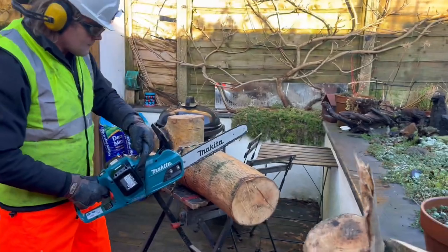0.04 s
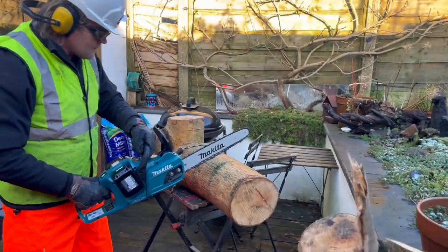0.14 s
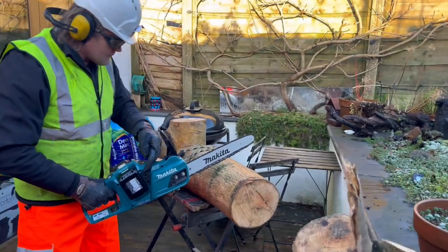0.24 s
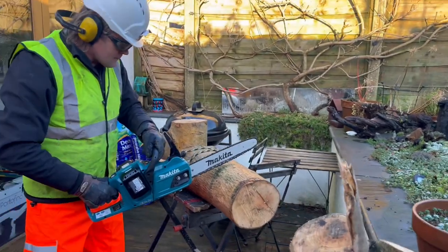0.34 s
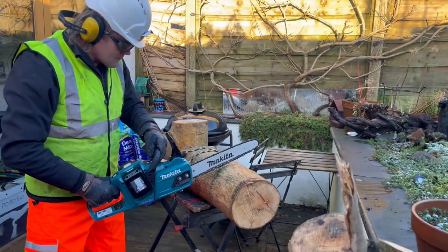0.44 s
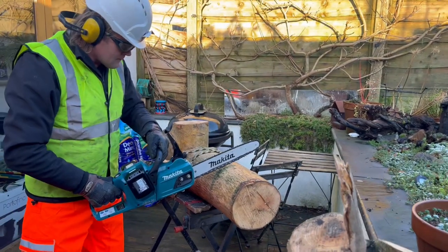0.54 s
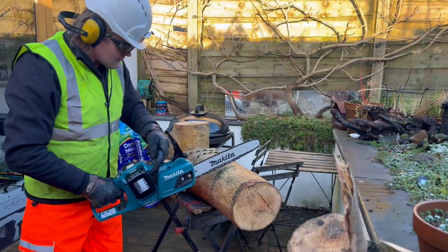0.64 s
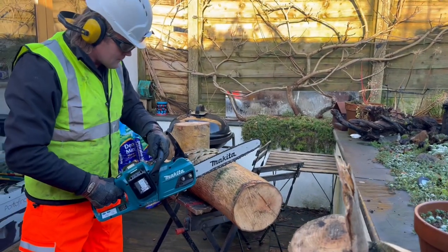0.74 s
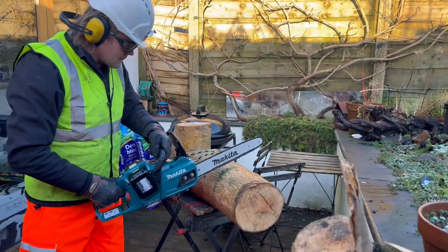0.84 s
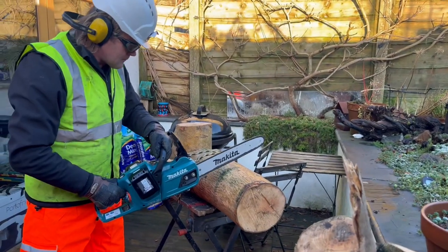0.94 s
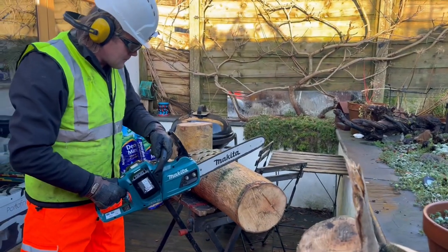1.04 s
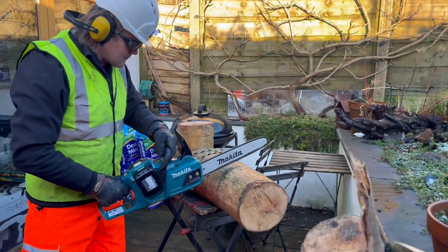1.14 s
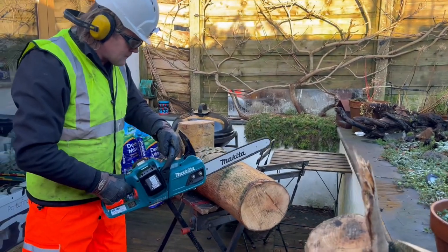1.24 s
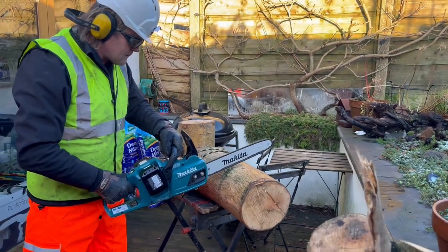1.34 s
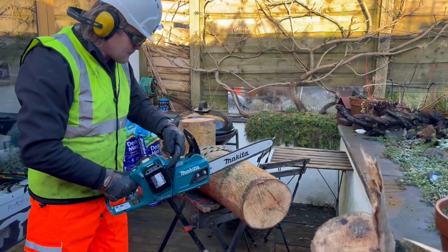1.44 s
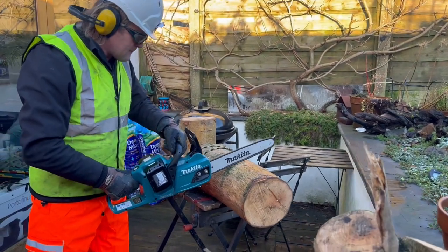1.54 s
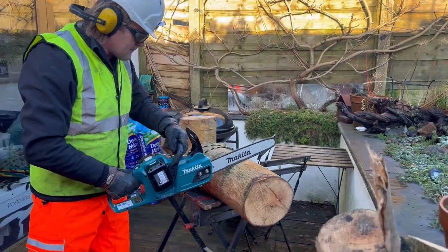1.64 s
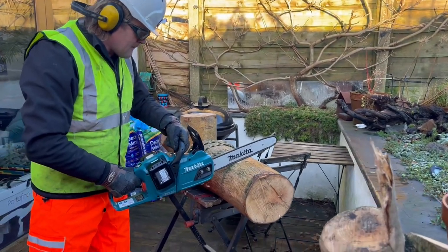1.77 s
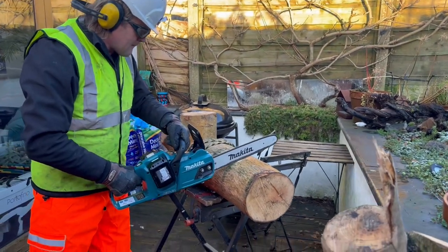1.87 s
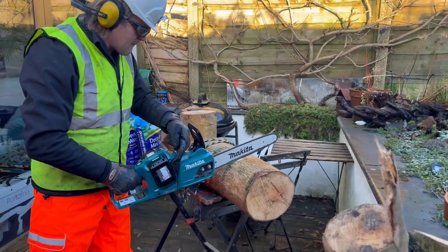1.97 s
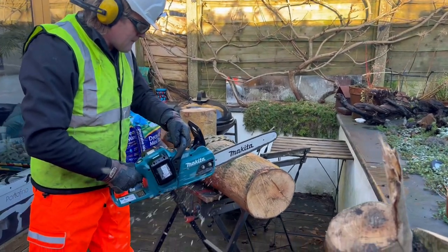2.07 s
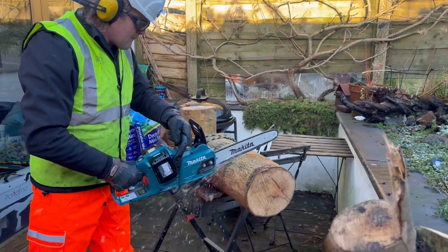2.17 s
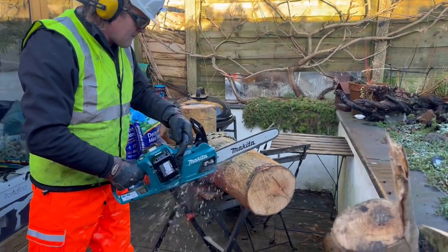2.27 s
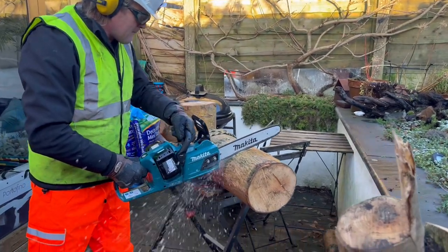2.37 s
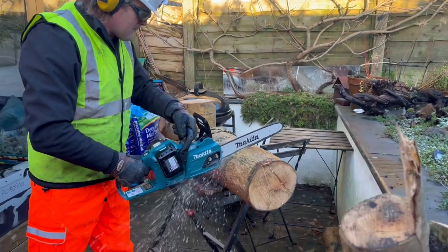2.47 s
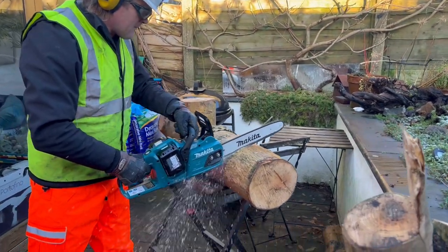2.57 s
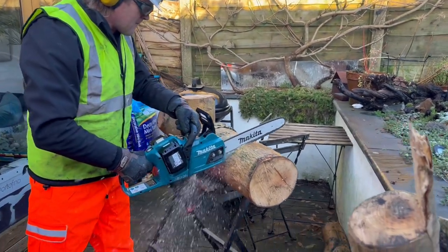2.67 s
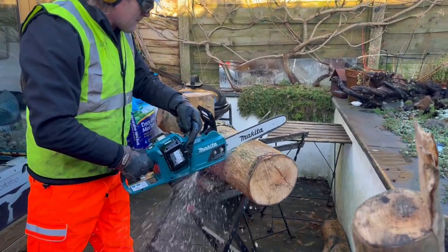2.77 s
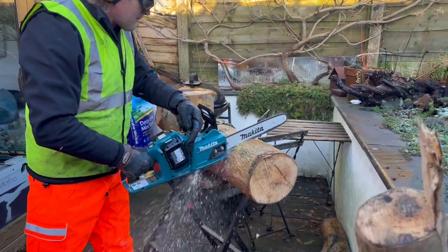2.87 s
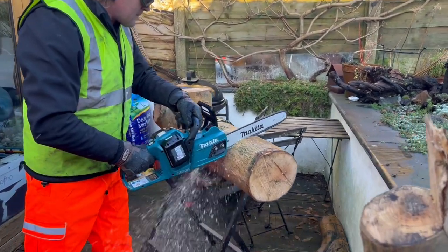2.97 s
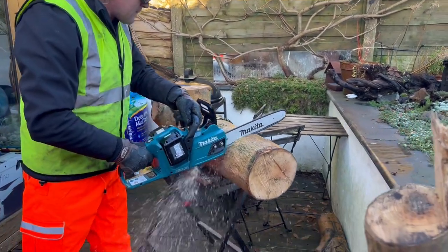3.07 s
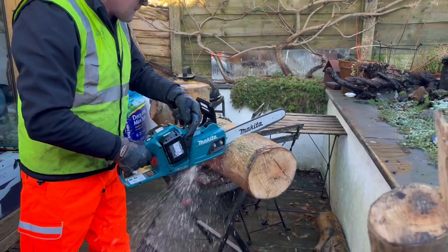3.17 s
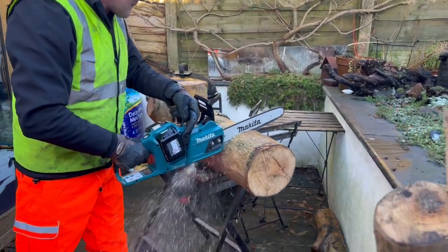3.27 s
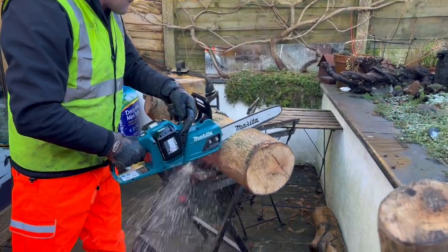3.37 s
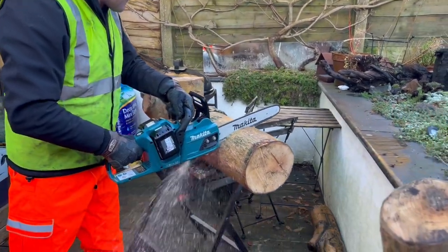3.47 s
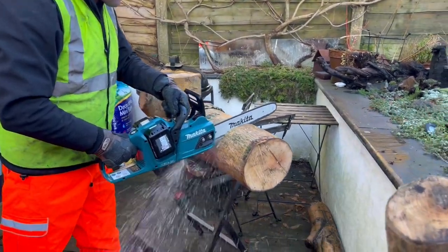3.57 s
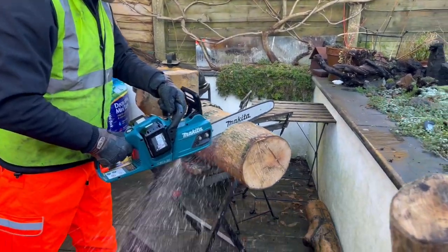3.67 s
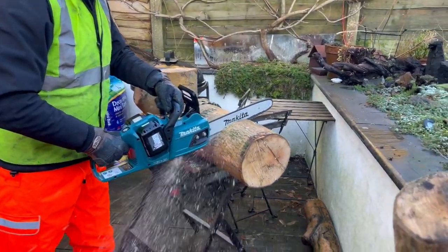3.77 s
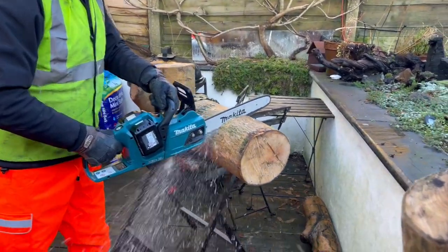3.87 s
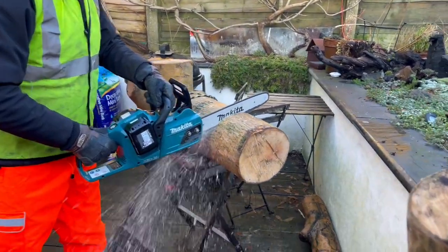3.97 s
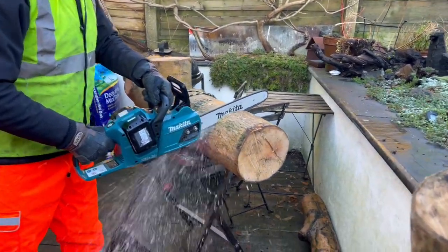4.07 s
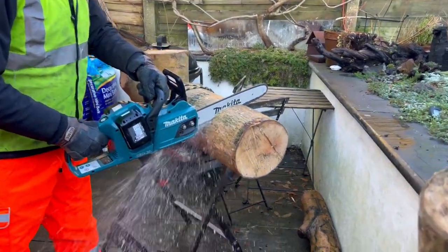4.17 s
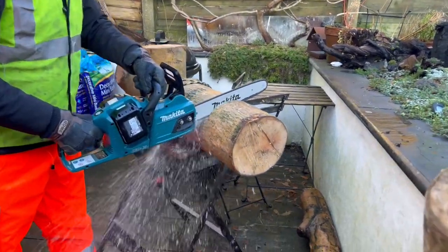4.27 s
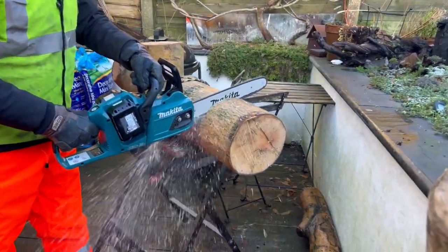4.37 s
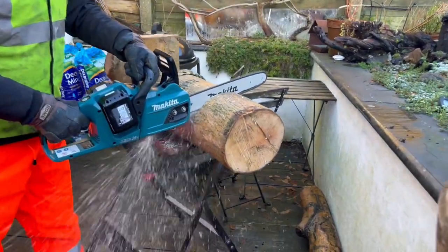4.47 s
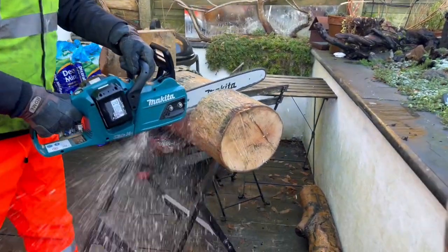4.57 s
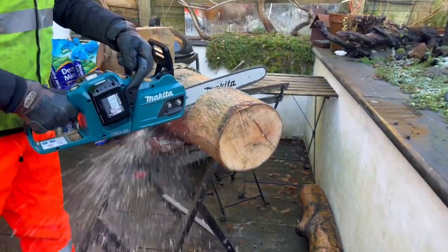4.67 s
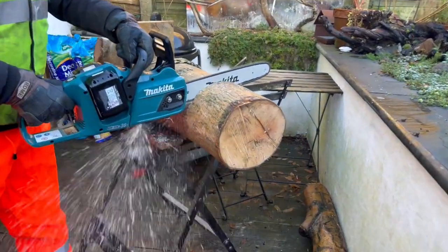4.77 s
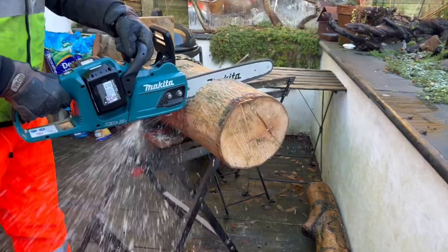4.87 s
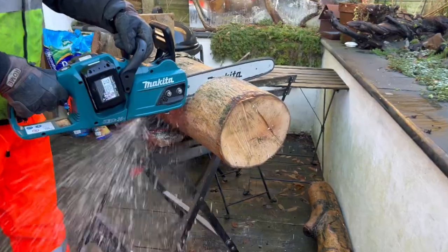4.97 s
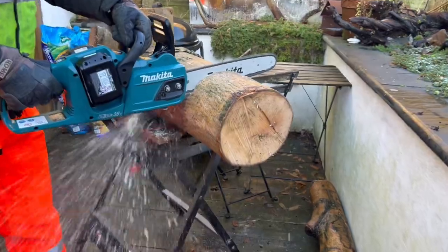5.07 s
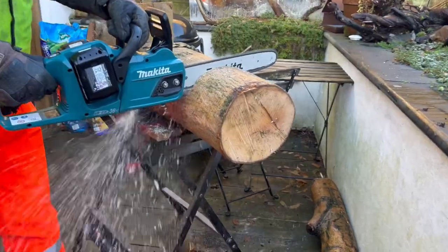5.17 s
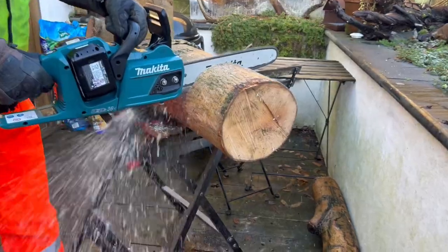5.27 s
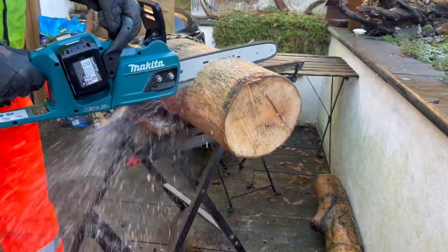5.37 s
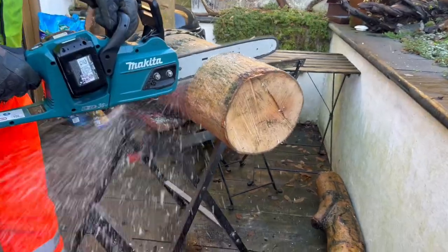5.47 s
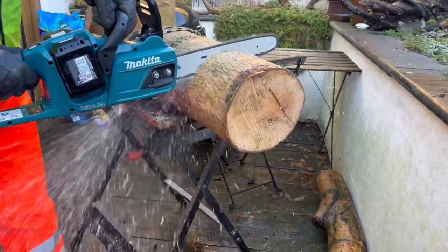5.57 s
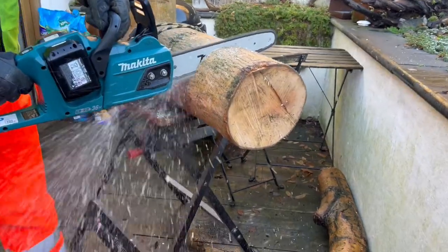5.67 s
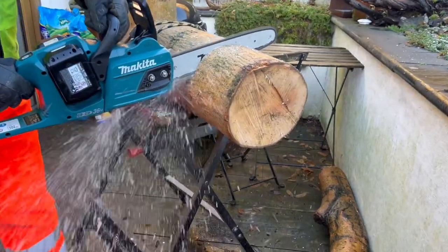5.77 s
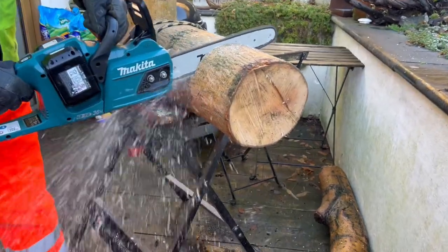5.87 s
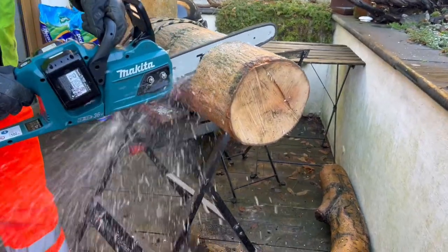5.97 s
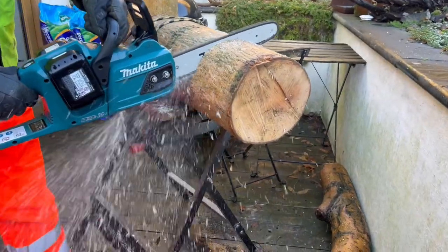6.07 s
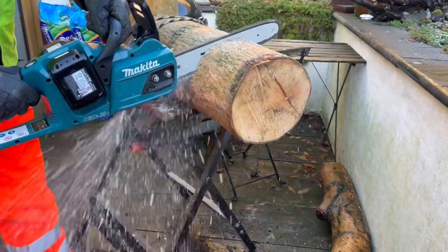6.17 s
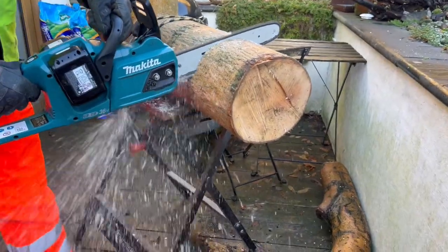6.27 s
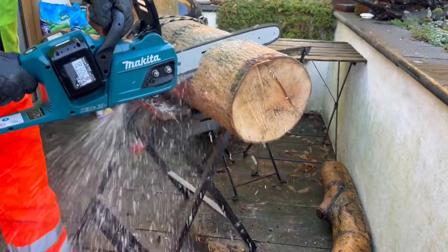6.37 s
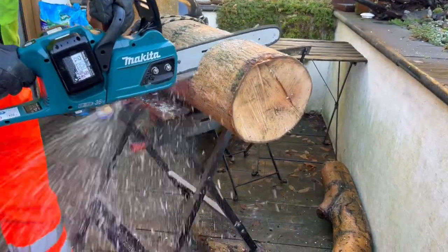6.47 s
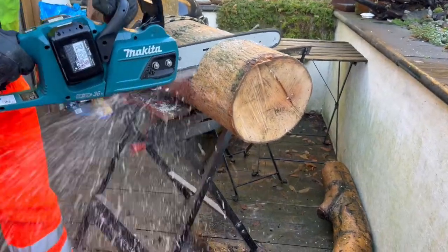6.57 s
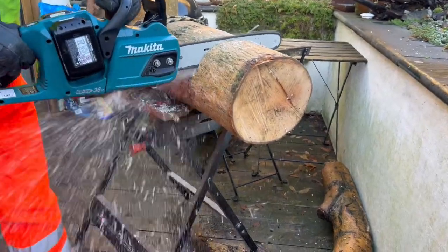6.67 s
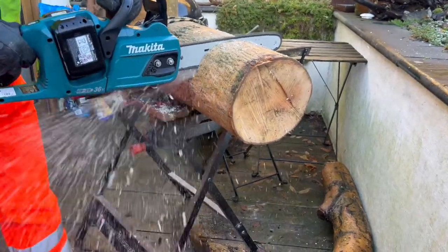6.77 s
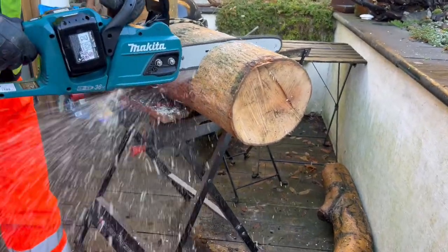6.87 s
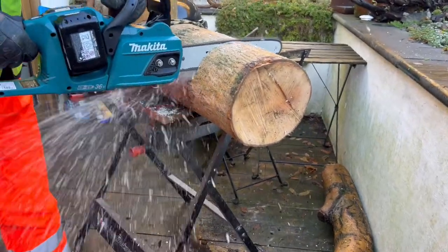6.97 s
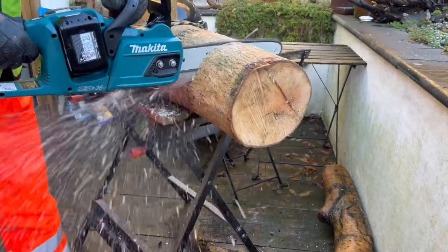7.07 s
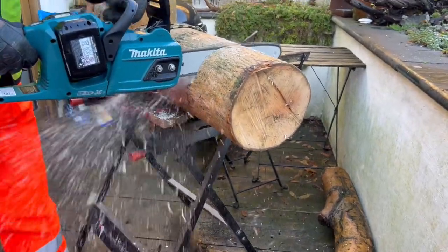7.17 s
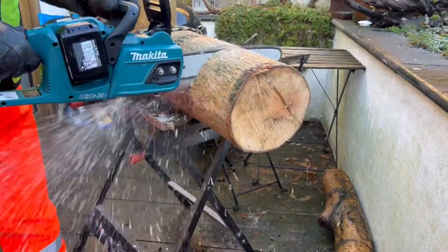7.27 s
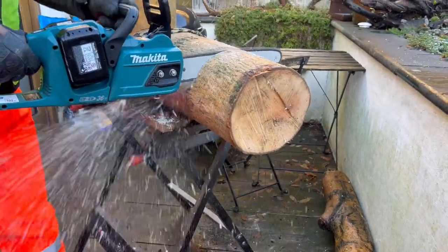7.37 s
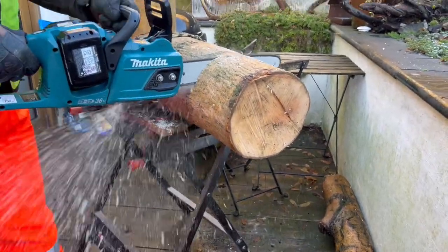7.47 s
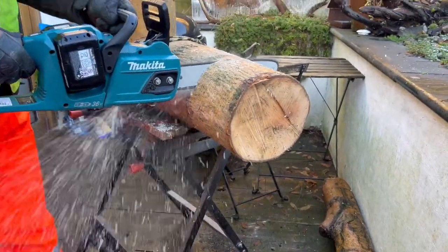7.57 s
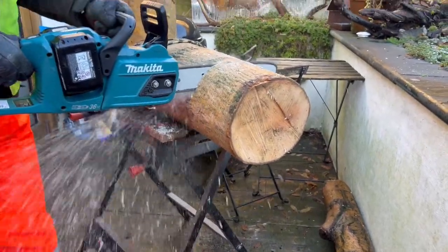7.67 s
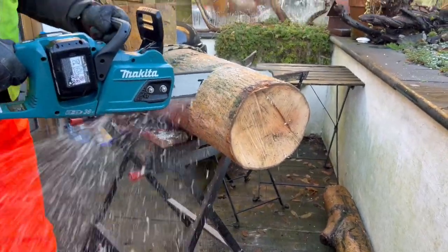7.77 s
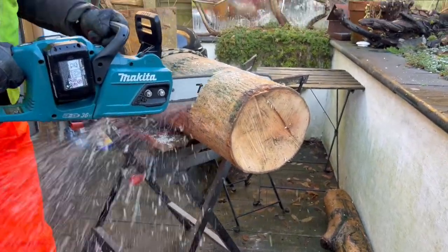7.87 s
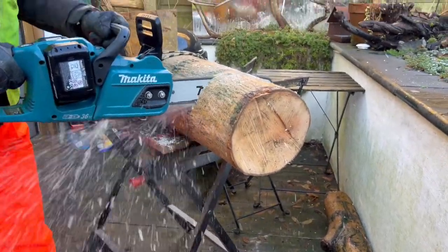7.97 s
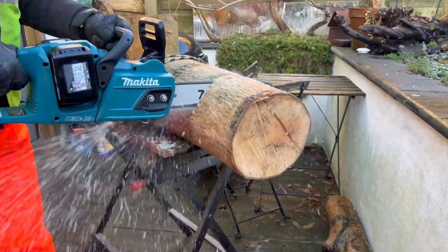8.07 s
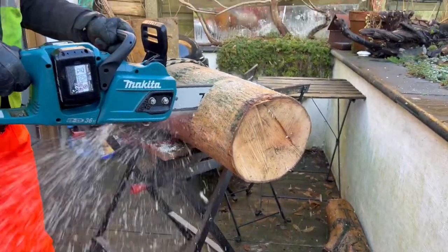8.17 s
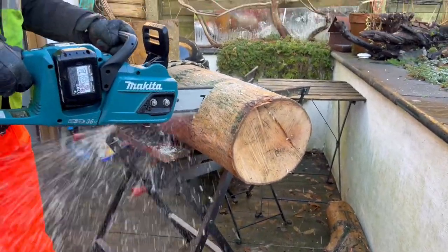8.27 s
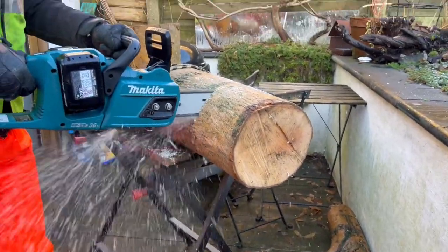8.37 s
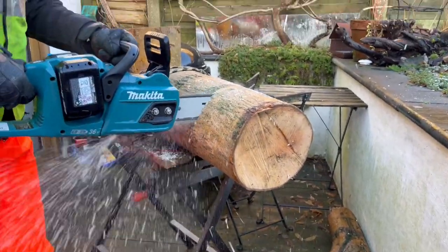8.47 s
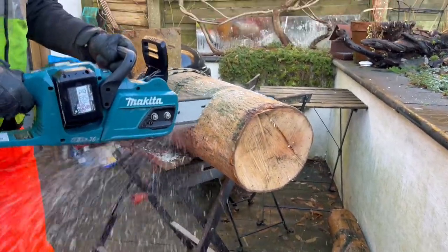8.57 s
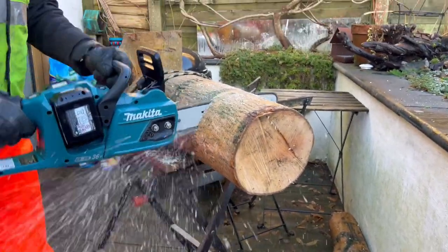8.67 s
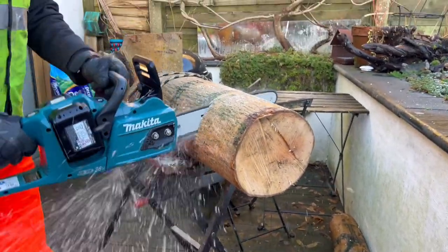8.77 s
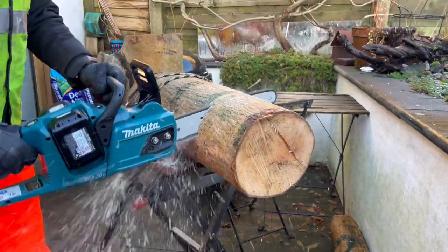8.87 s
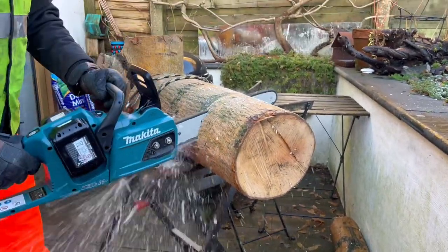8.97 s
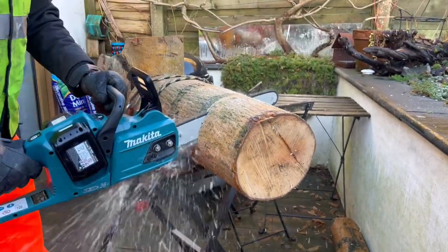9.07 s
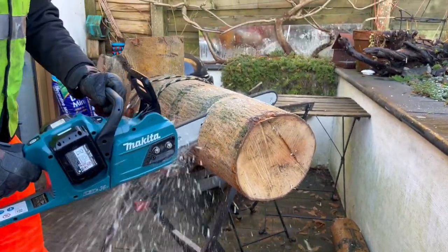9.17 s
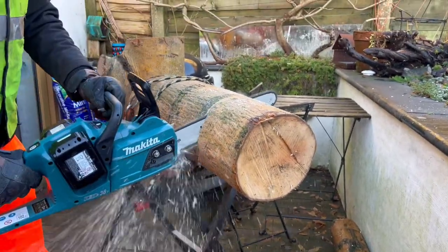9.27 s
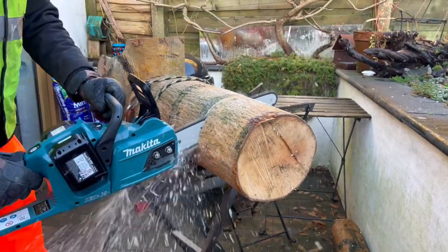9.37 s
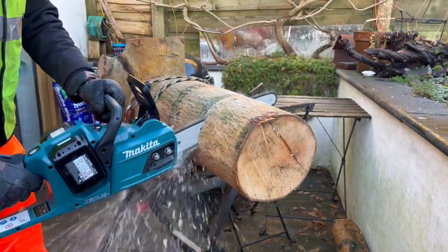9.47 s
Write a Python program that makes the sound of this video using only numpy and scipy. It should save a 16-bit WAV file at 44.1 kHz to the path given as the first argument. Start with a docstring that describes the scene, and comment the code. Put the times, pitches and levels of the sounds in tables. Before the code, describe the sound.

A cordless chainsaw is heard close up outdoors. Before it starts there are just two dull steps, a soft rustle and a low far rumble. The trigger clicks, the motor rises quickly to a loud electric whine, and the chain clatters freely. Soon the teeth enter a log, and the sound becomes a slightly lower, uneven whine with rough wood tearing and bright hiss, continuing to the end.

```python
"""A battery chainsaw is switched on in a small fenced garden, spins up and sinks into a log.
Its motor whines at multiples of the shaft speed (six sprocket teeth, twelve poles), the chain
clatters in the bar and housing, and the cutters tear the wood, all close to a hand-held phone.
Before the start come two soft footfalls, a rustle, a faint whistle and glove squeaks.
A far rumble lies under everything."""
import sys
import numpy as np
from scipy import signal
from scipy.fft import rfft, irfft, next_fast_len
from scipy.io import wavfile
from scipy.ndimage import uniform_filter1d, map_coordinates

SR = 44100
rng = np.random.default_rng(int(sys.argv[2]) if len(sys.argv) > 2 else 0)


def unload_audio(sound):
    """Save the sound as a 16-bit wav file, at the path given as the first command line argument."""
    columns = np.transpose(np.atleast_2d(sound))
    # keep every value between -1 and 1, then stretch to whole-number steps
    steps = np.round(np.clip(columns, -1, 1) * 32767)
    wavfile.write(sys.argv[1], SR, steps.astype(np.int16))


N = 420273
T = np.arange(N) / SR
SIZE = next_fast_len(N + SR // 4, True)
HZ = np.arange(SIZE // 2 + 1) * SR / SIZE + 1e-3

# trigger, brake and first chain slaps: t/s, relative level/dB
KNOCKS = [(0.833, -38), (0.847, -36), (0.855, -14.5), (0.981, -17), (1.078, -4), (1.138, -3)]
SWITCH_ON_S = KNOCKS[0][0]
# bands of the clatter (trestle, log, bar, housing, rivets, links, hiss, sizzle): lowest f/Hz,
# level running free/dB, entering the wood/dB, deep in it/dB, boost at rest/dB, exponent of slowness
CLATTER_BANDS = [(216, -11.5, -14, -15, 18.5, 1.7), (394, -10, -15, -11.5, 19, 1.25),
                 (723, -8, -1, -2, 19.5, 0.63), (1348, 8.5, 3.5, 0.5, 19, 2.55),
                 (2605, 3.5, 1.6, -5.5, -3, 1.9), (4170, 2, -2.5, -1.5, -4, 1.3),
                 (6330, -0.5, -8.5, -7, 2.5, 1.1), (7400, 1, 1, -3, -8, 0.55)]


def undb(db):
    """Turn decibels into a gain."""
    return 10 ** (np.asarray(db) / 20)


def unit(x):
    """Scale a signal to an average (rms) strength of 1."""
    return x / np.sqrt(np.mean(x ** 2))


def curves(table):
    """Join the rows of a time table into one curve per value column."""
    times, *columns = np.transpose(table)
    return [np.interp(T, times, column) for column in columns]


def over_hz(table):
    """Join the rows of a frequency table into a curve."""
    hz, value = np.transpose(table)
    return np.interp(np.log(HZ), np.log(np.maximum(hz, 1)), value)


def band(spectrum, lo_hz, hi_hz):
    """Cut one band out of a spectrum and return it as sound of strength 1."""
    damping = np.sqrt((1 + (lo_hz / HZ) ** 16) * (1 + (HZ / hi_hz) ** 16))
    return unit(irfft(spectrum / damping, SIZE)[..., :N])


def wander(rate):
    """A smooth random curve with about `rate` new values a second."""
    hold = int(SR / rate)
    steps = np.repeat(rng.standard_normal(N // hold + 1), hold)
    return unit(uniform_filter1d(uniform_filter1d(steps, hold), hold)[:N])


def stereo_noise(pulse=1):
    """Left and right noise spectra that pulse together, alike in the bass and unlike in the treble."""
    # how alike the two sides are: f/Hz, likeness/0-1
    likeness = [(100, 0.93), (300, 1), (700, 0.85), (1500, 0.66), (2200, 0.5), (3000, 0.16), (5000, 0.32),
                (9000, 0)]
    alike = np.clip(over_hz(likeness), 0, 1)
    mid, side = rfft(pulse * rng.standard_normal((2, N)), SIZE)
    return np.sqrt(1 + alike) * mid + np.sqrt(1 - alike) * side * np.array([[1], [-1]])


def sine(hz, db):
    """A pure tone that follows a pitch curve."""
    return np.sqrt(2) * undb(db) * np.sin(2 * np.pi * np.cumsum(hz) / SR)


def garden():
    """Far rumble throughout; a rustle and a thin whistle until the saw is switched on."""
    # colour of the rumble: f/Hz, relative level/dB
    rumble_colour = [(25, -16), (45, 0.5), (70, -7), (190, -13.5), (270, -15.5), (531, -30.5), (994, -27),
                     (1910, -37), (3750, -38.5), (8570, -47), (9960, -58)]
    # loudness of the rumble: t/s, level/dB
    rumble_level = [(0, -49.5), (1.1, -58.5), (6.3, -59), (7.5, -63), (9.53, -52)]
    # nearby rustle: t/s, level/dB, treble against that level/dB
    rustle_level = [(0, -58, -14), (.15, -60, -10), (.2, -58, -7), (.3, -56, -8), (.41, -64, -8),
                    (.43, -60, -2), (.57, -66, -6.5), (.62, -85, 4), (.8, -70.5, -5)]
    # thin whistle: t/s, f/Hz, level/dB
    whistle = [(.1, 2900, -85), (.12, 2880, -60), (.14, 2890, -79), (.17, 2900, -62), (.24, 2953, -66),
               (.29, 2981, -99)]
    rumble = band(stereo_noise() * undb(over_hz(rumble_colour)), 36, 12000)
    rumble *= undb(curves(rumble_level)[0] + 2 * wander(2.02))
    db, treble_db = curves(rustle_level)
    noise = stereo_noise()
    rustle = band(noise / (1 + 2j * (HZ - 1650) / 500), 1606, 3100)
    rustle += undb(treble_db) * band(noise, 2982, 8000)
    return rumble + (rustle * undb(db) + sine(*curves(whistle))) * (T < SWITCH_ON_S)


def footfalls():
    """A heel thuds into soft ground and the sole scuffs."""
    # steps: t/s, thud level/dB, scuff level/dB, scuff length/s, scuff top f/Hz
    steps = [(0.14, -24.5, -53.5, 0.008, 1394), (0.454, -23.5, -49, 0.029, 7700)]
    # tones of the ground: f/Hz, relative level/dB, time to fade by 60 dB/s
    ground = [(59.2, -7.5, 0.39), (68.4, -3, 0.21), (139, -11.5, 0.13), (200, -11.5, 0.11)]
    out = np.zeros(N)
    grit = rfft(rng.standard_normal(N), SIZE) / (HZ + 2500)
    for start, db, scuff_db, length, top_hz in steps:
        age = np.maximum(T - start, 0)
        thud = sum(undb(level) * np.sin(2 * np.pi * hz * age) * np.exp(-np.log(1000) * age / fade)
                   for hz, level, fade in ground)
        out += 2 * undb(db) * thud * (1 - np.exp(-age / 0.024))
        scuff = (T > start - .008) * np.exp(-np.maximum(age - length, 0) / 0.018)
        scuff *= 1 + 1.35 * np.exp(-np.abs(T - start + 0.0082) / 0.0056)  # the sole lands with a tick
        out += undb(scuff_db) * band(grit, 221, top_hz) * scuff
    return out


def glove_squeaks():
    """A glove rubs the handle: narrow bands of noise swell and fade."""
    # squeaks: t/s, length/s, f/Hz, level/dB
    squeaks = [(0.701, .09, 4300, -73), (0.733, .07, 3700, -71)]
    rasp = band(stereo_noise(), 1, 150)
    return sum(rasp * sine(np.full(N, hz), db) * np.sin(np.pi * np.clip((T - start) / length, 0, 1))
               for start, length, hz, db in squeaks)


def log_jolt():
    """The log jolts on its trestle with a dull, short knock."""
    # the knock: t/s, level/dB, decay/s, top f/Hz
    jolt = (6.5, -36, 0.04, 651)
    start, db, decay, top_hz = jolt
    thump = band(rfft(rng.standard_normal(N), SIZE) / (HZ + 100), 80, top_hz)
    return undb(db) * thump * (T > start) * np.exp(-np.abs(T - start) / decay)


def add_echoes(sound):
    """Log, wall, ground and fence throw the treble back; the delays drift as saw and phone move."""
    # close surfaces: delay/ms, level/dB
    echoes = [(2.3, -12.5), (4.1, -10), (6.7, -9), (10.9, -8)]
    out = sound.copy()
    treble = signal.sosfilt(signal.butter(2, 1800, "high", fs=SR, output="sos"), sound)
    for ms, db in echoes:
        drift = wander(.6)
        for side in range(2):
            lag = SR * ms / 1000 * (1 + 0.0593 * drift + 0.0087 * wander(0.588))
            echo = map_coordinates(treble[side], [np.arange(N) - lag], order=3, prefilter=False)
            out[side] += undb(db) * echo
    return out


def bar_ringing(in_wood):
    """The bar (the blade that guides the chain) and cover ring, lifting or dipping narrow bands."""
    # rings: f/Hz, width/Hz, lift running free/dB, lift in the wood/dB
    rings = [(570, 49, 2.5, 8.5), (884, 43, 9.5, 8), (1073, 167, 9.5, 9.5), (1340, 100, -0.5, -2),
             (1470, 230, 3.5, -0.5), (1638, 66, 5.5, 6.5), (1736, 120, 10.5, 6), (2054, 150, 3.5, 9),
             (3250, 200, 2.5, 3), (3630, 68, 6.5, 6), (5717.1, 180, -1, 2), (6392, 230, -2, -1),
             (8238.6, 750, 1.5, 2)]
    return 1 + sum((undb(wood_db if in_wood else free_db) - 1) / (1 + 2j * (HZ - hz) / width)
                   for hz, width, free_db, wood_db in rings)


def start_clicks():
    """Short plastic and steel knocks: bursts of noise ring the bar and cover."""
    bursts = sum((T >= start) * undb(db) * np.exp(-np.abs(T - start) / 0.0036) for start, db in KNOCKS)
    colour = bar_ringing(in_wood=False) / (1 + (800 / HZ) ** 4) / (1 + HZ / 2000)
    return undb(-7.5) * irfft(rfft(bursts * rng.standard_normal(N), SIZE) * colour, SIZE)[:N]


def bright_hiss(chain_db):
    """Bright bands of hiss wander, swell and fade as the bar turns towards and away from the phone."""
    # one table per band: t/s, centre f/Hz, level against the chain/dB
    tracks = [
        [(1.0, 3450, -19), (1.4, 3505, -6), (2.2, 3700, -16), (4.2, 3750, -16), (4.8, 3820, 1), (5.4, 3700, -8),
         (6.5, 3700, -6), (7.2, 3530, -18.5), (9.5, 3480, -15)],
        [(1.0, 5900, -6), (1.25, 5863, 1), (1.6, 5850, -12), (2.3, 5850, -1), (3.0, 5650, 2.5),
         (3.6, 5700, -10), (5.0, 5700, -7.5), (6.5, 5600, -12.5), (7.2, 5550, -12), (8.1, 5800, 0),
         (8.8, 5790, -11), (9.5, 5700, -16.5)],
        [(1.0, 6853, -15), (1.5, 6700, -5), (2.0, 6400, -13), (2.5, 6566, 0), (3.1, 6511, -15), (3.8, 6460, -2),
         (4.4, 6760, -10), (4.8, 6570, -29), (5.5, 6500, -5.5), (6.2, 6670, -7), (6.8, 6506, -9),
         (7.6, 6568, -12), (8.3, 6320, -13), (8.8, 6290, -1), (9.5, 6710, -12)],
        [(1.0, 8700, -16), (1.4, 8700, -1), (2.0, 8570, -9.5), (3.2, 8600, -5), (4.0, 8224, -12),
         (4.8, 8100, -19), (5.4, 8110, -1), (6.4, 8150, -1), (6.8, 8166, -7), (7.6, 8220, -6), (8.3, 8300, -19),
         (9.2, 8200, 1.5), (9.5, 8530, -7)],
    ]
    # spread of each band: half width/Hz
    half_widths = [119.7, 140, 220, 350]
    out = 0
    for track, half_width in zip(tracks, half_widths):
        hz, db = curves(track)
        noise = band(stereo_noise(), 0.87, half_width)
        out += noise * sine(hz * (1 + .008 * wander(3)), chain_db + db + 1.5 * wander(6))
    return out * (T > tracks[0][0][0])


def clatter_levels(shaft_hz, bite):
    """Level of each band: a slow chain rattles more in the bass, and the cut changes the colour."""
    free_hz, sink_start_s, sink_end_s = 178.4, 3.3, 6.94
    slowness = np.clip(1 - shaft_hz / free_hz, 0, 1) * (1 - bite)
    depth = np.clip((T - sink_start_s) / (sink_end_s - sink_start_s), 0, 1)
    return [free + bite * (wood - free) + depth * (deep - wood) + boost * slowness ** exponent
            for _, free, wood, deep, boost, exponent in CLATTER_BANDS]


def chain_clatter(angle, bite, chain_db, levels):
    """Chain links strike the bar and cover, pulsing with each sprocket tooth and each shaft turn."""
    # colour of the blows: f/Hz, relative level/dB
    blow_colour = [(110, -30.5), (200, -30.5), (290, -24), (450, -18), (660, -6.5), (800, 1), (1300, -2.5),
                   (2500, -8.5), (3900, -7.5), (4150, -14), (5000, -7.5), (5900, -5), (8600, -1.5),
                   (9500, -6.5), (9900, -25.5)]
    pulse = 1 + 0.13 * np.cos(6 * angle) + 0.21 * (1 - bite) * np.cos(angle)
    blows = stereo_noise(pulse * undb(0.73 * wander(300))) * undb(over_hz(blow_colour))
    blows = rfft(add_echoes(irfft(blows, SIZE)[:, :N]), SIZE)
    free, cutting = blows * bar_ringing(in_wood=False), blows * bar_ringing(in_wood=True)
    push = wander(3.9) + 0.35 * bite * wander(40)  # the hands press unevenly and the cutters grab
    edges = [row[0] for row in CLATTER_BANDS]
    out = band(blows, 99, edges[0]) * undb(levels[0] - 22.5)
    for lo, hi, db in zip(edges, edges[1:] + [12000], levels):
        part = (1 - bite) * band(free, lo, hi) + bite * band(cutting, lo, hi)
        out += part * undb(db + 0.5 * push + 0.9 * wander(9))
    return out * undb(chain_db) * (T > SWITCH_ON_S)


def high_singing(angle):
    """High multiples of the shaft speed fade in, flutter and fade out."""
    # tones: t/s, length/s, multiple, level/dB
    tones = [(2.201, 0.31, 18, -44), (4.3, 0.94, 18, -38.5), (7.8, .5, 33, -49), (8.445, 0.45, 18, -41.5),
             (8.802, .75, 30, -43), (4.45, .9, 24, -37)]
    out, fade_s = 0, .1
    for start, length, multiple, db in tones:
        swell = np.clip(np.minimum(T - start, start + length - T) / fade_s + .5, 0, 1)
        out += swell * undb(db + 2.3 * wander(20)) * np.sin(multiple * angle)
    return np.sqrt(2) * out


def start_chirp():
    """The motor's slots give a quick rising whine as the rotor breaks loose."""
    # slot whine: t/s, f/Hz, level/dB
    chirp = [(.948, 910, -31), (.962, 1194, -21.5), (.968, 1340, -42), (.974, 1526, -8.5),
             (.98, 1640, -32.5), (1.005, 2360, -29), (1.022, 2770, -18.5), (1.035, 3000, -29.5)]
    return sine(*curves(chirp)) * (T > chirp[0][0]) * (T < chirp[-1][0])


def motor_whine(angle, bite, chain_db):
    """Sprocket teeth and motor poles sing; weaker wavering tones join as the speed settles."""
    # tone of the six teeth: t/s, level/dB
    teeth = [(0.99, -61), (1.07, -33), (1.12, -30), (1.155, -41.5), (1.19, -22), (1.21, -24), (1.232, -38),
             (1.258, -19.5), (1.288, -38), (1.305, -21), (1.6, -16), (2.16, -27), (2.42, -38), (2.65, -28),
             (3.1, -44), (3.4, -41.5), (4.0, -37), (4.29, -41.5), (4.55, -32), (5.0, -37), (5.15, -30),
             (5.4, -26.5), (6.0, -33.5), (6.29, -39), (6.46, -31.5), (7.22, -31.5), (7.32, -35),
             (7.48, -40), (7.56, -30), (8.65, -31.5), (8.78, -46), (9.1, -49), (9.2, -37), (9.5, -31.5)]
    # tone of the twelve poles: t/s, level/dB
    poles = [(0.99, -38), (1.02, -34.5), (1.055, -30), (1.09, -24.5), (1.115, -39), (1.14, -19),
             (1.16, -32), (1.195, -18), (1.23, -20.5), (1.27, -31), (1.6, -25), (2.16, -32.5), (2.46, -22),
             (2.54, -35.5), (2.73, -29), (2.82, -40), (3.2, -37.5), (3.27, -29), (3.38, -30.5), (3.5, -51),
             (3.62, -34), (3.75, -32), (4.2, -30.5), (4.45, -24.5), (4.55, -33), (4.7, -27.5),
             (5.01, -29.5), (5.07, -41), (5.27, -38), (5.33, -27), (5.44, -28), (5.52, -40), (5.68, -24.5),
             (5.78, -47), (5.86, -28.5), (6.06, -31.5), (6.13, -54), (6.46, -37), (6.88, -41.5),
             (7.0, -32.5), (7.27, -33), (7.34, -44.5), (7.45, -33.5), (7.9, -34.5), (8.4, -35), (8.7, -42),
             (8.88, -35), (9.0, -40), (9.5, -54)]
    # weak tones against the chain: multiple (rounded below), level free/dB, level in the wood/dB
    weak_tones = [(1, -14, -27.5), (1.97, -17.5, -35.5), (3.03, -14, -16), (4.95, -5.5, -20),
                  (7.983, -2, -30.5), (9.01, -15, -16), (9.9, -3, -18.5), (14, -8, -27), (15, -0.5, -22),
                  (18.12, -13, -21.5), (20.7, -0.5, -17), (30.03, -7.5, -24), (33.064, -5, -24)]
    waver, flutter = wander(5), wander(50)
    slack_db = 4.5 * (T < 1.18) * wander(69.909)  # the slack chain rattles while it speeds up
    out = 0
    for multiple, level, chatter_db in [(6, teeth, 2.27), (12, poles, 0)]:  # teeth chatter in the wood
        db = curves(level)[0] + slack_db + wander(60) + chatter_db * bite * wander(90)
        out += undb(db) * np.sin(multiple * angle)
    settled = np.clip((T - 1.15) / 0.45, 0, 1)
    for multiple, free_db, wood_db in weak_tones:
        whole = round(multiple)
        wobble_db = np.roll(3.1 * waver + 2.3 * flutter, 7919 * whole)  # shifted so each tone differs
        db = chain_db + free_db + bite * (wood_db - free_db) + min(multiple / 8, 1) * wobble_db
        out += settled * undb(db) * np.sin(whole * angle + multiple ** 2)
    return np.sqrt(2) * out * (T > teeth[0][0])


def chainsaw():
    """One shaft drives both whine and clatter; its speed is less steady in the wood."""
    # motor speed: t/s, turns per second/Hz
    shaft_speed = [(0.948, 19), (1.0, 47), (1.06, 76), (1.09, 92), (1.14, 117), (1.17, 133), (1.194, 141),
                   (1.232, 151), (1.26, 156), (1.33, 165.5), (1.43, 173.5), (1.59, 178.4), (2.2, 177.9),
                   (2.46, 173.4), (2.8, 166.6), (3.15, 164.2), (3.47, 167), (3.98, 166.9), (4.1, 163.5),
                   (4.43, 159.7), (5.06, 156.6), (5.33, 161), (5.55, 159.5), (5.93, 160.8), (6.14, 158.2),
                   (6.55, 158.6), (6.96, 155.2), (7.2, 155.3), (7.33, 150), (7.45, 152), (7.6, 157.5),
                   (7.83, 157.3), (8.04, 154), (8.38, 153.5), (8.55, 156.6), (9.0, 153), (9.2, 156.2),
                   (9.53, 156.6)]
    # loudness of the chain links: t/s, level/dB
    chain_level = [(0.84, -63.5), (0.86, -50), (0.885, -57), (0.93, -54.5), (0.97, -44), (1.1, -31.5),
                   (1.2, -28), (1.7, -30.5), (1.95, -34), (2.2, -33), (2.7, -33.5), (3.0, -33.5),
                   (3.5, -34), (4.6, -32), (5.4, -30.5), (6.6, -31.5), (7.3, -31.5), (8.5, -32),
                   (9.53, -32.5)]
    # the chain bites: t/s, share in the wood/0-1
    wood_share = [(2.05, 0.048), (2.7, 1)]
    shaft_hz, chain_db, bite = curves(shaft_speed)[0], curves(chain_level)[0], curves(wood_share)[0]
    unsteady = 1 + 0.00074 * wander(30) + 0.00301 * bite * wander(9)
    angle = 2 * np.pi * np.cumsum(shaft_hz * unsteady) / SR
    clatter = chain_clatter(angle, bite, chain_db, clatter_levels(shaft_hz, bite))
    noises = clatter + bright_hiss(chain_db) + start_clicks()
    return noises + start_chirp() + motor_whine(angle, bite, chain_db) + high_singing(angle)


def at_phone(sound):
    """The phone's two microphones each hear the saw with their own delay and shadow."""
    # shadow: f/Hz, left minus right level/dB
    shadow = [(60, -5.5), (110, -3), (180, -1), (320, -0.5), (570, -2.5), (1000, 4), (1760, -1.5),
              (3090, -1.5), (5420, 8.5), (9510, 1.5)]
    # delay: f/Hz, lead of the left side/radians
    lead = [(100, -0.54), (400, 1.22), (690, 1), (1210, 1.02), (1720, 1.71), (2410, 0.87), (3450, 4),
            (4130, 1.5), (4910, -1.5), (5430, -1.5), (5940, -4), (7240, -7), (8100, -7), (8870, -14),
            (9650, -14.5)]
    # the phone turns a little: t/s, left minus right level/dB
    swing = [(0.9, 0), (1.35, 0.5), (1.7, 0.5), (3.4, -0.7), (3.8, 0.5), (4.2, -0.5), (5.0, 0.5),
             (8.6, 0.6), (9.3, 0)]
    left = undb(over_hz(shadow) / 2) * np.exp(.5j * over_hz(lead))
    heard = irfft(rfft(sound, SIZE) * np.array([left, 1 / left]), SIZE)[:, :N]
    swing_db = curves(swing)[0]
    return heard * undb(np.array([swing_db, -swing_db]) / 2 + 0.53)


def scene():
    """The close saw over the quiet sounds around it."""
    return at_phone(chainsaw()) + footfalls() + glove_squeaks() + log_jolt() + garden()


def record(dry):
    """The phone rounds the loudest peaks and steeply cuts the highest treble."""
    ceiling, top_hz = .95, 9900
    treble_cut = signal.ellip(12, .3, 90, top_hz, fs=SR, output="sos")
    return signal.sosfilt(treble_cut, ceiling * np.tanh(dry / ceiling))


dry = scene()
out = record(dry)
unload_audio(out)
```